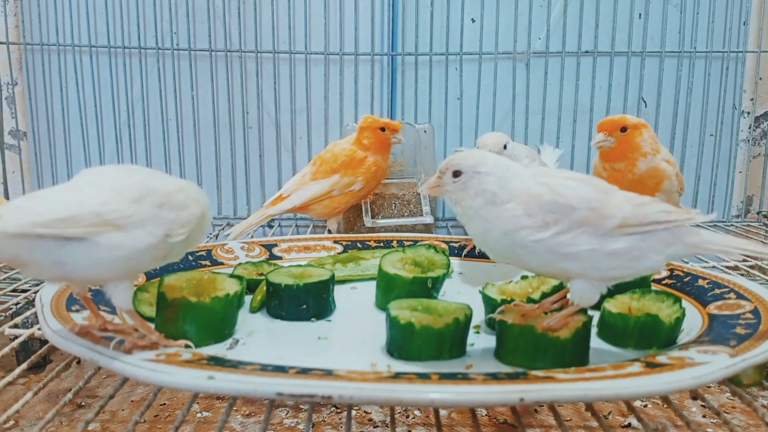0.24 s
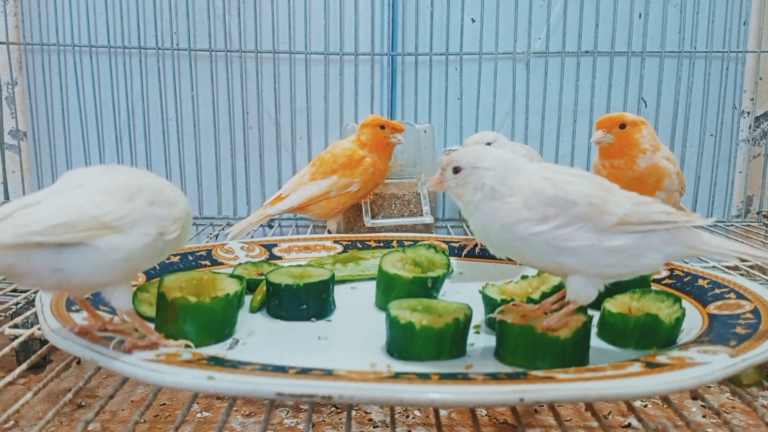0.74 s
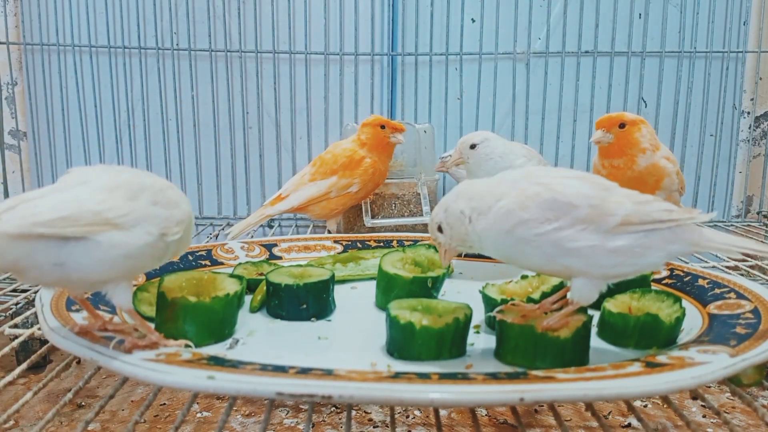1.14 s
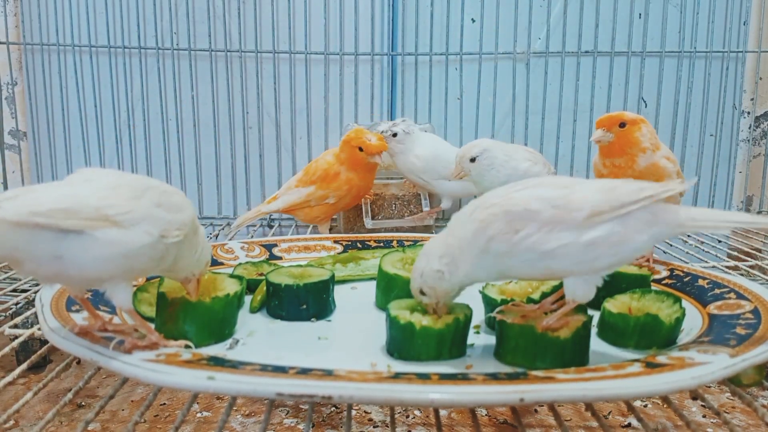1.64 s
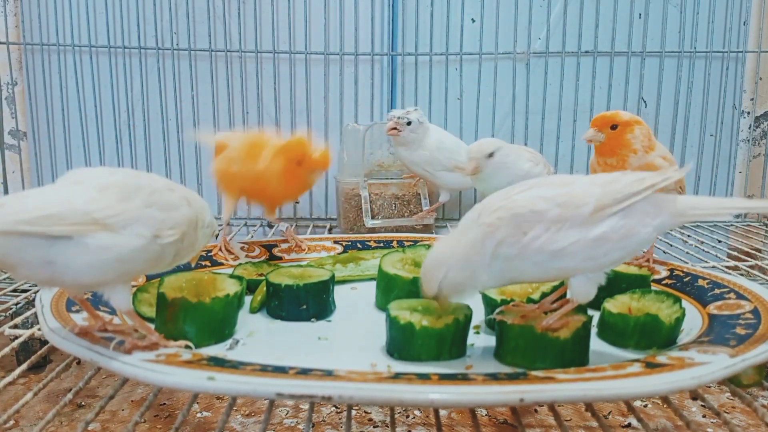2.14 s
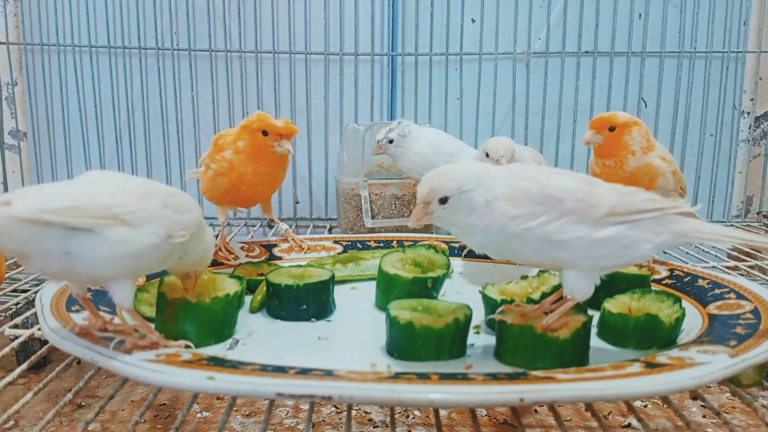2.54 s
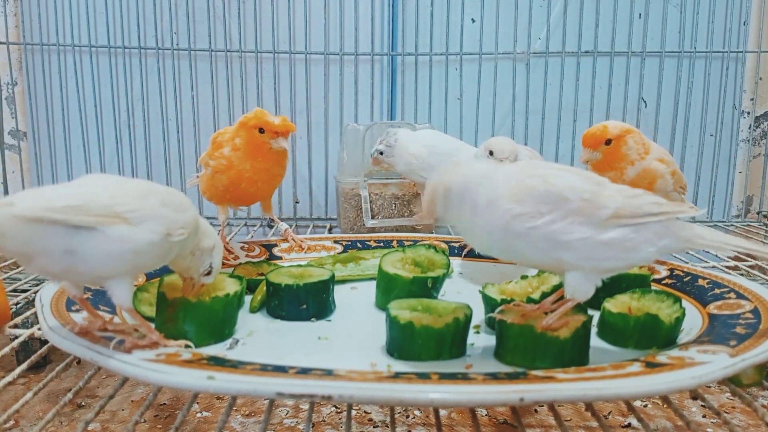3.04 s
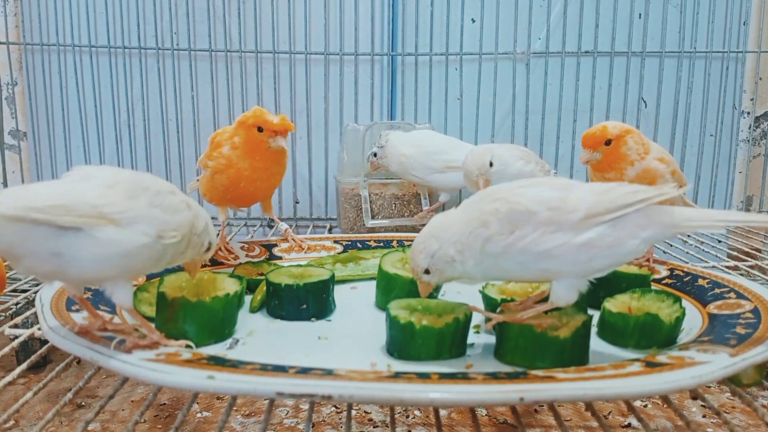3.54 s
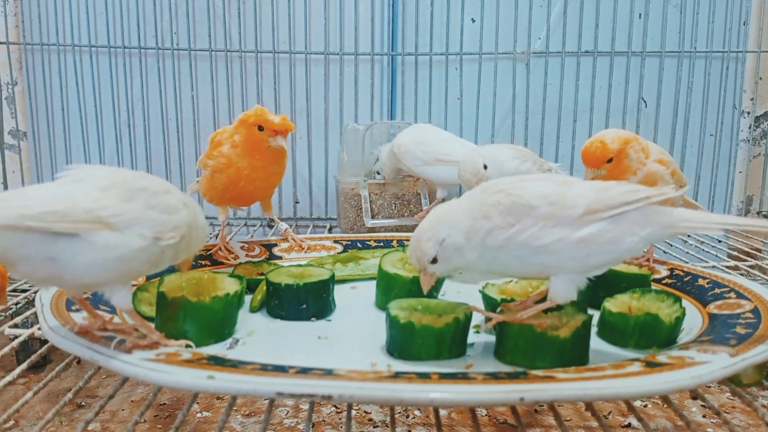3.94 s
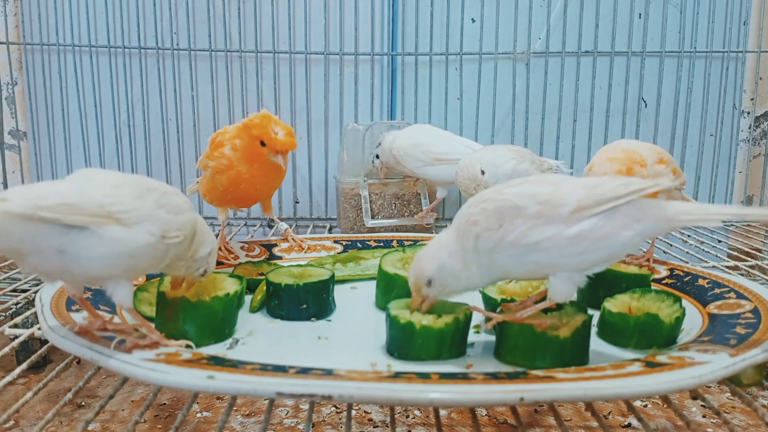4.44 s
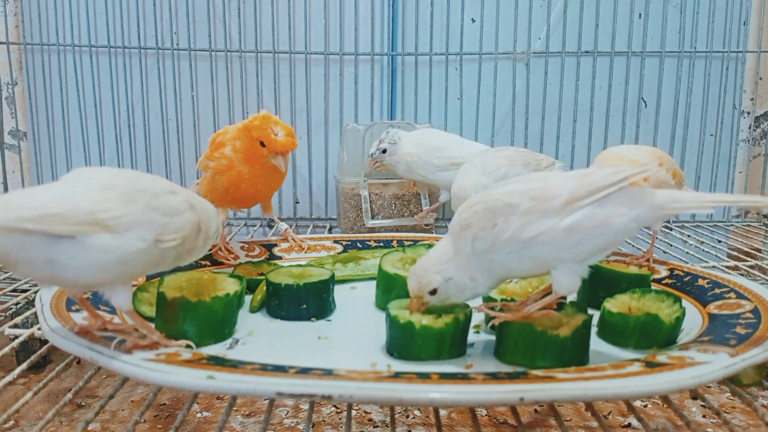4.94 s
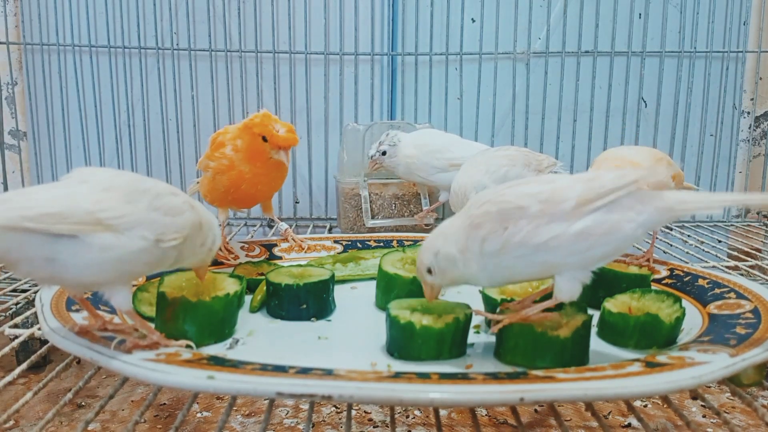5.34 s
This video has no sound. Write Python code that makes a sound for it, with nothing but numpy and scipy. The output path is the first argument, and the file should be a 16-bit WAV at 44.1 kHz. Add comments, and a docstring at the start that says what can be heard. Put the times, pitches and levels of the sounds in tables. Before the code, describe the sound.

Close by in an indoor cage, canaries twitter in overlapping whistles, sliding notes and tiny buzzes, with feathers rustling throughout. A louder run of chirps comes near the middle, followed by a lull of distant whistles and then the loudest few chirps. Faint nibbling and dull pecks on a plate sit beneath the birds, along with quiet room air and an appliance hum. The room adds a short ring.

```python
"""Bright canary whistles overlap in a wire cage indoors, heard by a phone beside the food plate.
Each note is a nearly pure tone from a bird's voice box that hooks, bows, slides down, buzzes or chips.
Wings rustle straight ahead, beaks peck and nibble, and other birds call further off.
The cage wires scatter the notes and the room adds a short ring.
Under it all lie soft room air, a low appliance hum, faint low hoots and a soft thud."""
import sys
import numpy as np
from scipy import signal
from scipy.fft import rfft, irfft
from scipy.io import wavfile
from scipy.ndimage import uniform_filter1d

SR = 44100
rng = np.random.default_rng(int(sys.argv[2]) if len(sys.argv) > 2 else 0)


def to_wav(sig):
    """Store sig (one row per channel, or 1-D mono) as 16-bit WAV at the path in sys.argv[1].

    Samples outside -1..1 are clipped; the rate is SR.
    """
    pcm = np.clip(np.atleast_2d(sig), -1, 1) * 32767
    pcm = np.round(pcm).astype(np.int16)
    wavfile.write(sys.argv[1], SR, pcm.T)  # frames by channels


N = 246959
TIME = np.arange(N) / SR
TOP_HZ = 15750  # the phone picks up little above this


def undb(db):
    """Turns decibels into a multiplier."""
    return 10 ** (np.asarray(db) / 20)


def unit(x):
    """Scales a sound to an average power of 1."""
    return x / np.sqrt(np.mean(x ** 2))


def drift(rate_hz, size=N):
    """Smooth random wandering with a spread near 1."""
    step = max(int(SR / rate_hz), 1)
    stairs = np.repeat(rng.standard_normal(size // step + 1), step)
    return 1.45 * uniform_filter1d(stairs, step)[:size]


def gate(start_s, end_s, rise_s, fall_s):
    """Fades in around the start and out around the end."""
    return (1 + np.tanh((TIME - start_s) / rise_s)) * (1 + np.tanh((end_s - TIME) / fall_s)) / 4


def add(track, start_s, sound):
    """Lays a sound into a track."""
    i = max(int(start_s * SR), 0)
    track[i:i + len(sound)] += sound[:N - i]


def noise(spectrum, width):
    """Stereo noise: spectrum sets its tone, width how much left and right differ."""
    log_hz = np.log(np.fft.rfftfreq(N, 1 / SR) + 1)
    curves = np.transpose(spectrum), np.transpose(width)
    colour, spread = (undb(np.interp(log_hz, np.log(hz), db)) for hz, db in curves)
    mid, side = rfft(rng.standard_normal((2, N))) * colour
    return unit(irfft(np.array([mid + spread * side, mid - spread * side]), N))


def progress(length_s):
    """Runs from 0 to 1 over a note."""
    return np.linspace(0, 1, int(length_s * SR))


def slide(length_s, start_hz, end_hz, curl, dip_hz):
    """Pitch slides and may sag midway; more curl makes it fall fast, then ever more slowly."""
    u = progress(length_s)
    return start_hz + (end_hz - start_hz) * u * (1 + curl) / (1 + curl * u) - dip_hz * np.sin(np.pi * u)


def bow(length_s, start, middle, end):
    """Pitch bends smoothly through three values."""
    return np.polyval(np.polyfit([0, .5, 1], [start, middle, end], 2), progress(length_s))


def voice_box(hz, db, waver, shimmer_db=1.3, edge_s=.002):
    """A bird's slightly unsteady tone with two weak, rough overtones; the upper one grows with pitch."""
    n = len(hz)
    phase = 2 * np.pi * np.cumsum(hz * (1 + waver * drift(450, n))) / SR
    rough_phase = phase + .5 * drift(1200, n)
    second = undb(-37) * np.sin(2 * rough_phase) * (2 * hz < TOP_HZ)
    third = undb(-50 + 18 * np.log2(hz / 3000)) * np.sin(3 * rough_phase) * (3 * hz < TOP_HZ)
    edges = signal.windows.tukey(n, min(2 * edge_s * SR / n, 1))
    return np.sqrt(2) * (np.sin(phase) + second + third) * edges * undb(db + shimmer_db * drift(200, n))


def note(hz, db, loudest_at, waver, swell_db=10, fade_db=7):
    """One whistle that swells and fades; loudest_at runs from 0 (its start) to 1 (its end)."""
    u = np.linspace(0, 1, len(hz))
    crest = np.clip(loudest_at, .02, .98)
    below_crest_db = np.where(u < crest, swell_db, fade_db) * np.interp(u, [0, crest, 1], [1, 0, 1]) ** 1.3
    octaves_per_s = np.abs(np.gradient(np.log2(hz))) * SR
    rounding = int(0.062 * len(hz)) + 1  # softens corners in the pitch
    hz, octaves_per_s = uniform_filter1d(np.array([hz, octaves_per_s]), rounding, mode="nearest")
    thinning_db = 0.15 * (octaves_per_s - np.median(octaves_per_s))  # fast glides thin the voice
    opening = np.sin(np.pi / 2 * np.clip(np.minimum(u / 0.059, (1 - u) / 0.063), 0, 1))
    return opening * voice_box(hz, db - below_crest_db - thinning_db, waver)


def sing(track, start_s, hz, db, loudest_at, left_db):
    """Adds a near bird's note from where it sits, left_db louder on the left than on the right."""
    sound = note(hz, db, loudest_at, waver=0.007)
    add(track[0], start_s, sound * undb(left_db / 2))
    add(track[1], start_s, sound * undb(-left_db / 2))


# Hooked calls: start_s, length_s, lead_s, start_hz, turn_hz, end_hz, curl, dip_hz,
# level_db, loudest_at, left_db
HOOKED_CALLS = [(0, 0.28, 0.05, 4610, 5670, 4177, 2.47, -1.5, -29.5, 0.57, 1.5),
                (1.865, 0.072, .028, 6010, 5890, 3640, 1.37, -5, -40, 0.27, 2),
                (2.417, .122, .056, 3584, 3600, 3040, 0.32, 288, -17.5, 0.58, 1.5),
                (4.633, 0.082, 0.011, 3080, 3686, 2928, 4.2, 1, -12, 0.64, 2.5),
                (4.785, 0.074, 0.0126, 3820, 5720, 4080, 9, 0, -17, 0.4, 2)]

def hooks():
    """The voice glides straight to a turning point, then slides down."""
    out = np.zeros((2, N))
    for start_s, length_s, lead_s, start_hz, turn_hz, end_hz, curl, dip_hz, *voice in HOOKED_CALLS:
        lead = start_hz + (turn_hz - start_hz) * progress(lead_s)
        fall = slide(length_s - lead_s, turn_hz, end_hz, curl, dip_hz)
        sing(out, start_s, np.append(lead, fall), *voice)
    return out


# Plain whistles, the last with a bright octave overtone in a row of its own:
# start_s, length_s, start_hz, middle_hz, end_hz, level_db, loudest_at, left_db
WHISTLES_AND_OVERTONE = [(0, 0.043, 3320, 4370, 5380, -26, 0, 3),
                         (0.017, 0.11, 3360, 3663, 3480, -30, 0.55, 1),
                         (0.11, 0.071, 4230, 4210, 4130, -33.5, 1, -7),
                         (0.533, 0.056, 3800, 4150, 3830, -42, .55, -6),
                         (0.706, 0.06, 4300, 4250, 4100, -39.5, .4, -7),
                         (.93, 0.065, 3960, 4010, 4290, -46.5, 0.75, -3),
                         (1.018, .15, 3020, 2712, 1986, -33, 0.51, 7),
                         (1.281, .05, 2940, 3270, 3270, -36.5, 0.32, -2),
                         (1.597, 0.052, 2480, 2653, 2680, -32.5, 1, 2),
                         (1.867, 0.22, 3006, 2746, 2660, -30.5, 0.45, 4.5),
                         (2.045, .07, 2717, 2970, 2996, -16, 0.76, 2.5),
                         (2.064, 0.07, 4290, 4250, 4220, -40, 0.2, 4),
                         (2.169, 0.085, 2360, 2384, 2480, -26.5, 0.2, -2.5),
                         (2.504, 0.12, 6750, 6740, 6920, -48.5, 0.27, 3),
                         (2.844, 0.024, 3840, 3620, 3000, -33.5, 0.56, 2),
                         (4.413, 0.15, 2672, 2709, 2645, -28.5, .5, 10),
                         (4.763, 0.036, 3570, 3960, 3780, -19.5, 0.74, -0.5),
                         (4.911, 0.03, 2910, 2964, 2990, -21, 0.68, 1),
                         (4.933, .031, 2240, 2514, 2910, -24, 0.7, 3),
                         (4.974, 0.04, 2945, 2940, 3030, -22.5, 1, -1),
                         (5.008, 0.043, 2167, 2590, 2650, -25.5, 0.3, 2),
                         (5.32, 0.0375, 4410, 4410, 4230, -41.5, 0.55, -1),
                         (5.327, 0.037, 8820, 8760, 8830, -59, 0.3, 1)]

def whistles():
    """The voice bends through three pitches in one smooth curve."""
    out = np.zeros((2, N))
    for start_s, length_s, start_hz, middle_hz, end_hz, *voice in WHISTLES_AND_OVERTONE:
        sing(out, start_s, bow(length_s, start_hz, middle_hz, end_hz), *voice)
    return out


# Echoes off nearby surfaces: left_delay_s, right_delay_s, gain_db
SURFACE_ECHOES = [(.0021, .0026, -18), (.0058, .0049, -19)]

def surface_echoes(voices):
    """The plate and cage walls add quick echoes that differ at the two microphones."""
    out = voices
    for *delays, db in SURFACE_ECHOES:
        echo = [np.interp(TIME - delay, TIME, side, left=0) for delay, side in zip(delays, voices)]
        out = out + undb(db) * np.array(echo)
    return out


def reverb(sound, ring_s, build_s, width):
    """Countless echoes blur into a tail that builds up, then dies by 60 dB over ring_s."""
    t = TIME[:SR]
    tail = np.exp(-np.log(1000) * t / ring_s) * (1 - np.exp(-t / build_s))
    mid, side = rng.standard_normal((2, SR)) * tail
    response = unit(np.array([mid + width * side, mid - width * side])) / np.sqrt(SR)
    return signal.fftconvolve(sound[None], response, axes=1)[:, :N]


def cage_and_room(near, far):
    """Thin wires scatter mostly the high notes; the room rings a little longer."""
    # fainter notes come from birds further back, so more of their sound arrives scattered
    loudness = np.sqrt(np.abs(uniform_filter1d(near ** 2, size=1500))) + undb(-49)
    scattered = near * (loudness / undb(-25)) ** -.35
    off_wires = signal.sosfilt(signal.butter(2, 3500, "high", fs=SR, output="sos"), scattered)
    cage = reverb(undb(-6) * off_wires + undb(-4) * far, ring_s=.12, build_s=.002, width=1.5)
    room = reverb(undb(-10) * scattered + undb(-1.5) * far, ring_s=0.31, build_s=0.0041, width=0.91)
    return cage + room


# Tone of the room air: frequency_hz, relative_db
AIR_TONE = [(25, -26), (45, -9.5), (65, 1.5), (110, 3.5), (160, -4.5), (260, 1.5), (340, -6), (560, -10.5),
            (1200, -11.5), (2000, -13.5), (3800, -15.5), (5500, -27.5), (8000, -29), (12000, -32),
            (15500, -44.5)]
# How wide the air sounds: frequency_hz, side_minus_middle_db
AIR_WIDTH = [(25, -14), (60, -19), (125, -7.5), (250, -20.5), (600, -9), (1800, -14), (3500, 1),
             (12000, -1)]
# Slow settling of the air (the hum moves twice as many dB): time_s, gain_db
AIR_SETTLING = [(0, 2), (2.2, 1.94), (2.9, 2), (4.0, 0.9), (4.8, -0.5), (5.4, -1.5)]
# Tones of the hum, before settling: pitch_hz, level_db
HUM_TONES = [(118, -58), (198, -60), (265, -60.5)]

def air_and_hum():
    """Softly rushing room air and a wavering appliance hum, both sinking a little toward the end."""
    settling = undb(np.interp(TIME, *np.transpose(AIR_SETTLING)))
    air = noise(AIR_TONE, AIR_WIDTH) * undb(-49.5 + 1.7 * drift(4.846))
    hum = 0
    for hz, db in HUM_TONES:
        hum += undb(db + 2.5 * drift(14)) * np.sin(2 * np.pi * hz * TIME + 0.58 * drift(6.9))
    return air * settling + hum * settling ** 2


def nibbles(count=70, decay_s=.006, band_hz=(900, 6000)):
    """Beaks and claws make tiny crunches at random moments."""
    bursts = np.zeros(N)
    decay = np.exp(-TIME[:SR // 20] / decay_s)
    for when, chance in rng.uniform(0, 1, (count, 2)):
        db = -59 + 3 * min(-np.log(chance), 2)  # most are faint, a few stand out
        add(bursts, when * TIME[-1], undb(db) * decay)
    band = signal.butter(1, band_hz, "band", fs=SR, output="sos")
    return bursts * unit(signal.sosfilt(band, rng.standard_normal(N)))


def twitter(count=16, until_s=2.9, typical_hz=3900, typical_s=.085):
    """Birds at the back of the cage trade soft notes, each a small random arch of pitch."""
    out = np.zeros(N)
    for k, (when, pitch, length, slope) in enumerate(rng.uniform(-1.1, 1, (count, 4))):
        start_s = (k + .5 + when / 2) * until_s / count
        arch = bow(typical_s * (1 + 0.48 * length), 0.951 + 0.063 * slope, 0.97, 0.951 - 0.063 * slope)
        hz = typical_hz * (1 + .15 * pitch) * arch
        add(out, start_s, note(hz, db=-51, loudest_at=0.64, waver=0.0147))
    return out


# Faint low hoots and, in the second row, a soft thud: start_s, length_s, pitch_hz, level_db
HOOTS_AND_THUD = [(0.09, 0.086, 381, -40.5), (1.547, 0.14, 329, -49), (2.81, 0.19, 388, -48.5),
                  (2.826, 0.41, 476, -50.5)]

def hoots_and_thud(blur_hz=55):
    """Hoots and the thud of a landing, each a low, blurred tone that starts quickly and fades slowly."""
    out = np.zeros(N)
    for start_s, length_s, hz, db in HOOTS_AND_THUD:
        phase = 2 * np.pi * hz * TIME
        blurred = drift(blur_hz) * np.sin(phase) + drift(blur_hz) * np.cos(phase)
        out += undb(db) * gate(start_s, start_s + length_s, rise_s=0.011, fall_s=0.14) * blurred
    return out


# Wing movements: start_s, end_s, rub_relative_db, hiss_relative_db
WING_RUSTLES = [(0.154, 0.267, -41.5, -60), (0.319, 0.446, -37, -56.5), (0.523, 0.702, -38, -57.5),
                (0.737, 0.854, -36, -56), (1.106, 1.153, -37.5, -60), (1.265, 1.309, -37.5, -56),
                (1.413, 1.57, -38.5, -57), (1.604, 1.677, -38, -54), (1.847, 1.897, -36, -57.5),
                (1.959, 2.072, -37.5, -51.5), (2.155, 2.252, -37.5, -49.5), (2.423, 2.49, -37.5, -54.5),
                (2.612, 2.661, -39, -48), (2.782, 2.864, -37, -57), (3.001, 3.064, -42, -66),
                (3.164, 3.195, -42.5, -63), (3.305, 3.355, -40, -56.5), (3.444, 3.522, -39, -60.5),
                (3.778, 3.875, -52, -69), (3.922, 4, -48.5, -68), (4.01, 4.1, -48.5, -82),
                (4.127, 4.256, -42.5, -60.5), (4.35, 4.423, -45.5, -71), (4.476, 4.64, -43, -59.5),
                (4.658, 4.781, -39, -51), (4.849, 4.914, -38.5, -55.5), (4.992, 5.071, -36.5, -59),
                (5.167, 5.23, -51.5, -58)]
# Tone of feathers rubbing: frequency_hz, relative_db
RUB_TONE = [(300, -19.5), (1200, -23), (1600, -10.5), (1950, -1), (2330, -3.5), (2750, 4), (3300, -2.5),
            (4400, -8), (5300, -17), (9000, -29.5), (15000, -54)]
# Tone of the fine feather hiss: frequency_hz, relative_db
HISS_TONE = [(3000, -33.5), (5200, -24.5), (5900, -2.5), (6400, -8.5), (7300, 6), (8300, 1), (9300, -12.5),
             (12500, -20.5), (15000, -15.5)]

def wings():
    """Feathers rub in bursts straight ahead, and their soft blades add a crackling hiss."""
    rub, hiss = np.zeros((2, N))
    for start_s, end_s, rub_db, hiss_db in WING_RUSTLES:
        burst = gate(start_s, end_s, rise_s=.005, fall_s=0.033)
        rub += burst * undb(rub_db - 1)
        hiss += burst * undb(hiss_db + 1)
    # the shafts and blades of the feathers catch and slip on their own
    shafts = undb(1.45 * drift(60) + 1.36 * drift(700))
    blades = undb(1.45 * drift(60) + 2.0 * drift(700))
    narrow = [(1000, -19)]
    return shafts * rub * noise(RUB_TONE, narrow) + blades * hiss * noise(HISS_TONE, narrow)


# Falling notes: start_s, length_s, start_hz, end_hz, curl, dip_hz, level_db, loudest_at, left_db
FALLING_NOTES = [(.346, 0.032, 4950, 3150, 0, -220, -30, 0.1, -3),
                 (0.622, .072, 4880, 3556, 5, 217, -28, 0, -4),
                 (1.082, .118, 5430, 3935, 12.5, 333, -33, 0.06, -6.5),
                 (1.532, 0.082, 5050, 4260, 3, 39, -42.5, 0.9, -5),
                 (1.681, 0.12, 4960, 4355, 1.5, 116, -36, 0.74, -3),
                 (2.06, 0.079, 8550, 7300, 0, -130, -38, 0.8, -7),
                 (2.135, 0.094, 6180, 5790, 3.5, 37, -38, 0.34, 1),
                 (2.225, 0.1, 7100, 6910, 5, 232, -39, 0.54, 0),
                 (2.322, 0.11, 8380, 7260, -0.2, 3, -39.5, 0.44, -7),
                 (2.68, 0.029, 4850, 3100, 1, 0, -38.5, 0.04, -3),
                 (2.724, 0.039, 6100, 4100, 0.6, 2, -34, 0.46, 1),
                 (2.75, 0.069, 6880, 4636, 2, 301, -31.5, .6, 0),
                 (2.834, 0.053, 4920, 4094, 2, -3, -30.5, 0.22, 0)]

def falling_notes():
    """The voice slides down, usually fastest at first; some notes dip and recover."""
    out = np.zeros((2, N))
    for start_s, length_s, start_hz, end_hz, curl, dip_hz, *voice in FALLING_NOTES:
        sing(out, start_s, slide(length_s, start_hz, end_hz, curl, dip_hz), *voice)
    return out


# Buzzy notes: start_s, length_s, start_hz, end_hz, swing_hz, swings_per_s, level_db
BUZZY_NOTES = [(1.344, 0.082, 3420, 3890, 326, 138, -37.5), (1.897, 0.054, 4800, 3530, 302, 115, -37.5),
               (2.155, 0.058, 3330, 3480, 328, 110, -39), (2.6, 0.046, 3116, 3280, 500, 51, -35.5),
               (2.62, 0.021, 6060, 5680, 352, 91, -34.5), (3.175, 0.021, 3400, 2956, 218, 92, -43),
               (3.311, 0.0265, 3417, 2990, 443, 99, -35.5), (4.846, 0.043, 3400, 1866, 413, 110, -42.5),
               (5.171, 0.044, 4300, 3794, 700, 77, -39.5)]

def buzzes():
    """The pitch swings up and down so quickly that a gliding note buzzes."""
    out = np.zeros(N)
    for start_s, length_s, start_hz, end_hz, swing_hz, swings_per_s, db in BUZZY_NOTES:
        t = TIME[:int(length_s * SR)]
        glide = start_hz + (end_hz - start_hz) * t / length_s
        swing = swing_hz * np.cos(2 * np.pi * swings_per_s * t)
        add(out, start_s, voice_box(glide + swing, db, waver=0.016))
    return out


# Pecks and footfalls on the plate: start_s, level_db
PLATE_PECKS = [(1.582, -46), (1.686, -48), (2.83, -50.5), (3.8, -45.5), (4.348, -56), (4.47, -49),
               (4.538, -51.5), (4.611, -53.5)]

def pecks(band_hz=(600, 1500), decay_s=0.05):
    """Beaks and feet make short, dull scuffs, muffled by the soft food."""
    band = signal.butter(1, band_hz, "band", fs=SR, output="sos")
    scuff = unit(signal.sosfilt(np.vstack([band, band]), rng.standard_normal(N)))
    return scuff * sum(undb(db) * (TIME > start_s) * np.exp(-np.abs(TIME - start_s) / decay_s)
                       for start_s, db in PLATE_PECKS)


# Far whistles: start_s, length_s, start_hz, middle_hz, end_hz, relative_db, loudest_at, waver_share
FAR_WHISTLES = [(1.618, 0.22, 1876, 1930, 2080, -52.5, 0.6, 0.0083),
                (2.717, .14, 2020, 2135, 2257, -39, 0.73, 0.027),
                (2.798, 0.27, 2318, 2348, 2320, -39, 0, 0.013),
                (2.86, 0.13, 7170, 7100, 7150, -63.5, 0.1, 0.007),
                (3.257, 0.1464, 2400, 2686, 2690, -37.5, 0.63, 0.0296),
                (3.34, 0.18, 2386, 2058, 1930, -39.5, .6, .036),
                (3.485, 0.114, 1855, 1652, 1695, -50, .3, 0.019),
                (3.605, 0.31, 1790, 1955, 2007, -48, 0.7, 0.021),
                (3.999, .27, 1905, 1994, 2075, -49.5, 0.7, .035),
                (5.32, 0.16, 3600, 3570, 3560, -63.5, 0, .005)]

def far_birds():
    """Birds further off draw out thin whistles, some hoarse from their wavering pitch."""
    out = np.zeros(N)
    for start_s, length_s, start_hz, middle_hz, end_hz, *voice in FAR_WHISTLES:
        add(out, start_s, note(bow(length_s, start_hz, middle_hz, end_hz), *voice))
    return out


# Tiny chirps: start_s, length_s, top_hz, level_db, left_db
CHIP_NOTES = [(2.308, 0.034, 3910, -25.5, 1.5), (2.341, 0.027, 3810, -17.5, 0.5),
              (2.369, .026, 3635, -16.5, 3), (2.395, .019, 3460, -24.5, 0), (4.608, .021, 3410, -21, 2.5)]

def chips(top_at=.37, drop_share=.175):
    """The voice flicks up and down, once alone or several times in a trill."""
    out = np.zeros((2, N))
    for start_s, length_s, top_hz, db, left_db in CHIP_NOTES:
        drop = np.sin(np.pi / 2 * (progress(length_s) - top_at) / (1 - top_at)) ** 2
        sing(out, start_s, top_hz * (1 - drop_share * drop), db, loudest_at=0.67, left_db=left_db)
    return out


def scene():
    """Birds near and far, their echoes, their wings and feeding, and the room behind them."""
    near = falling_notes() + hooks() + whistles() + chips() + buzzes()
    far = far_birds() + twitter()
    song = surface_echoes(near) + undb(1) * far + cage_and_room(near.mean(axis=0), far)
    return song + wings() + pecks() + nibbles() + air_and_hum() + hoots_and_thud()


def record(dry):
    """The phone cuts off the very highest treble."""
    return signal.sosfilt(signal.ellip(10, .2, 80, TOP_HZ, fs=SR, output="sos"), dry)


dry = scene()
out = record(dry)
to_wav(out)
```